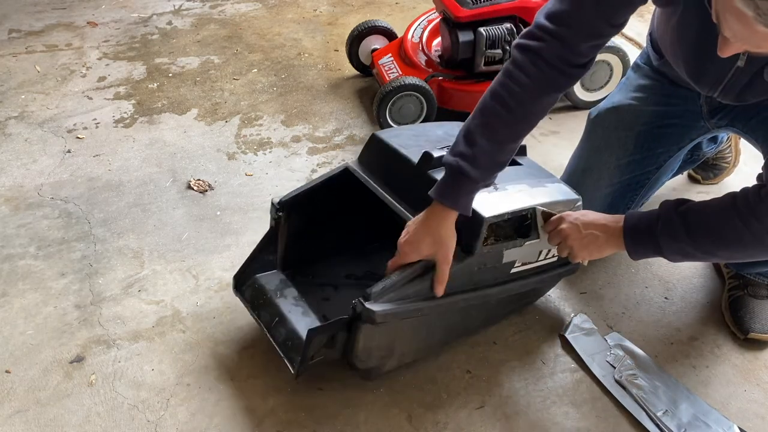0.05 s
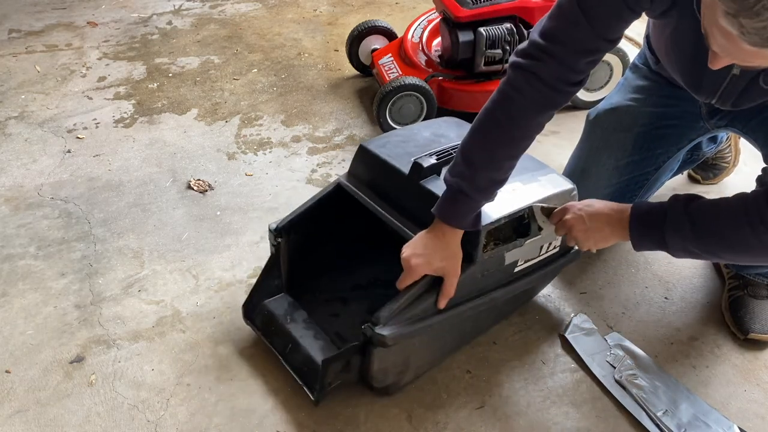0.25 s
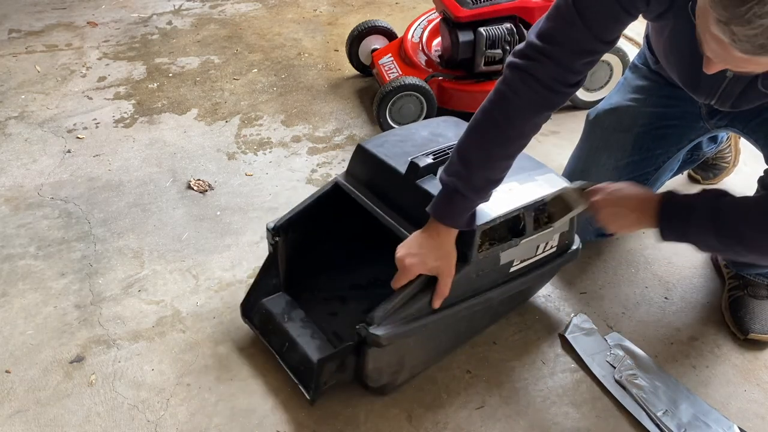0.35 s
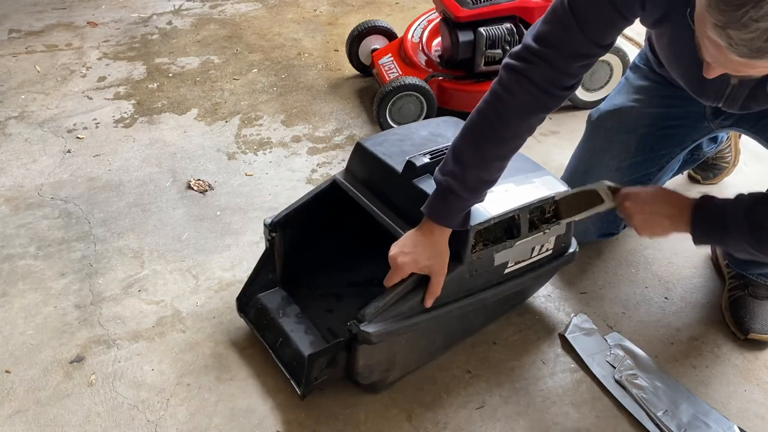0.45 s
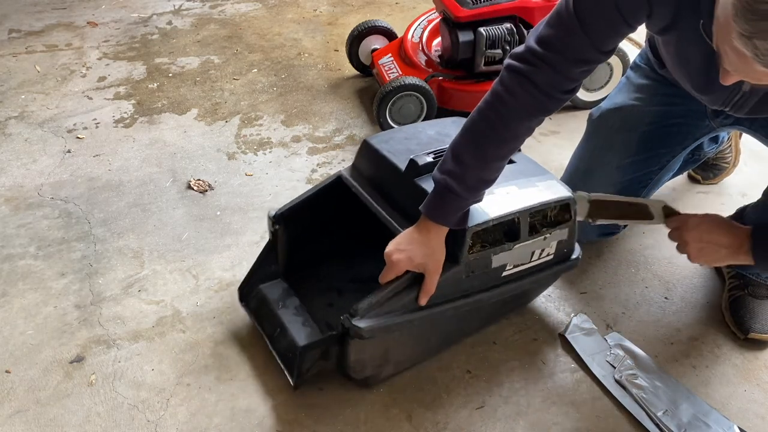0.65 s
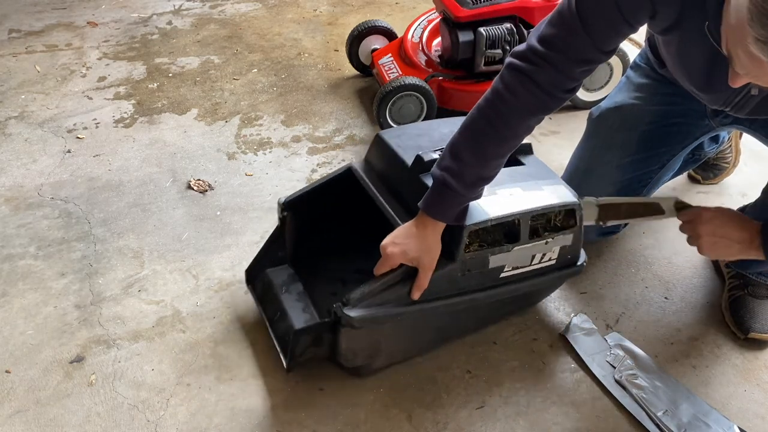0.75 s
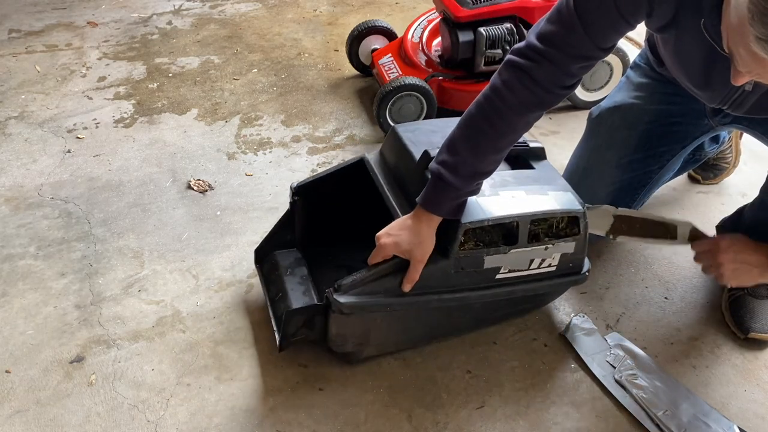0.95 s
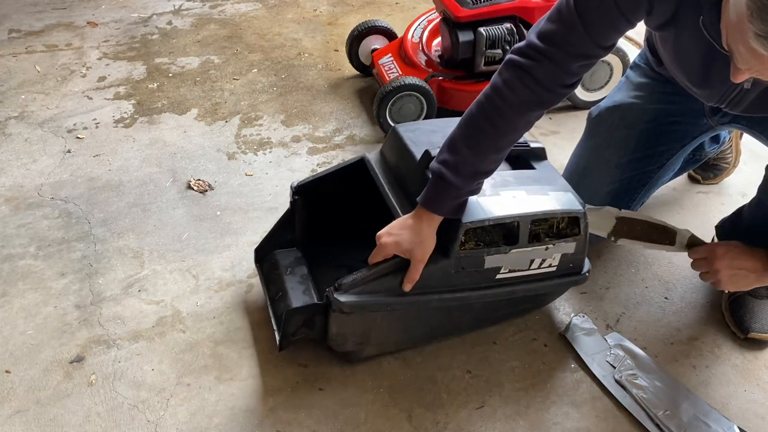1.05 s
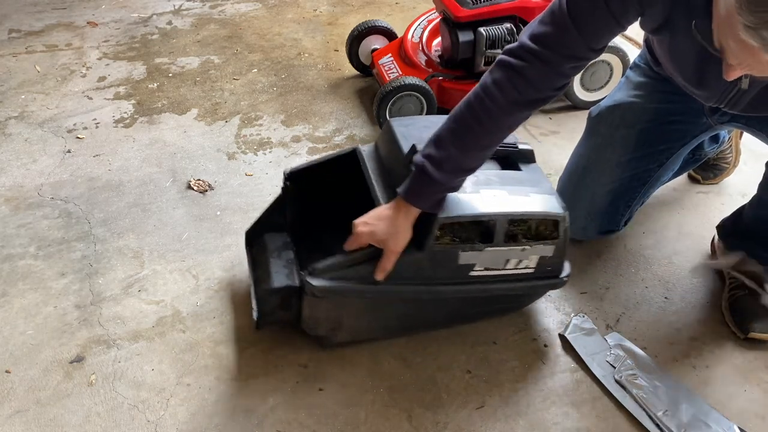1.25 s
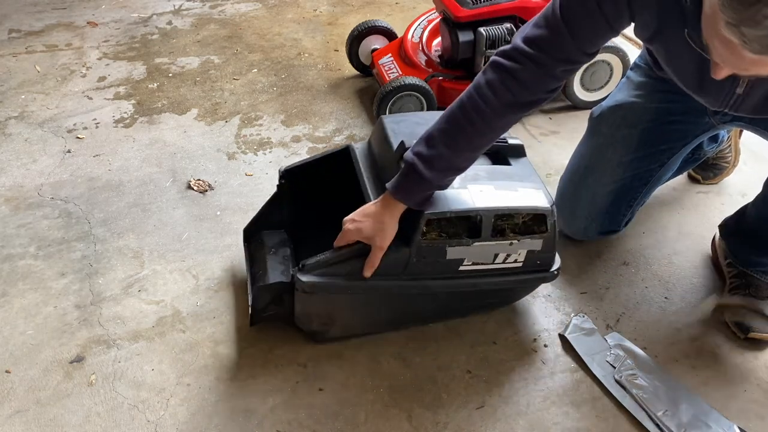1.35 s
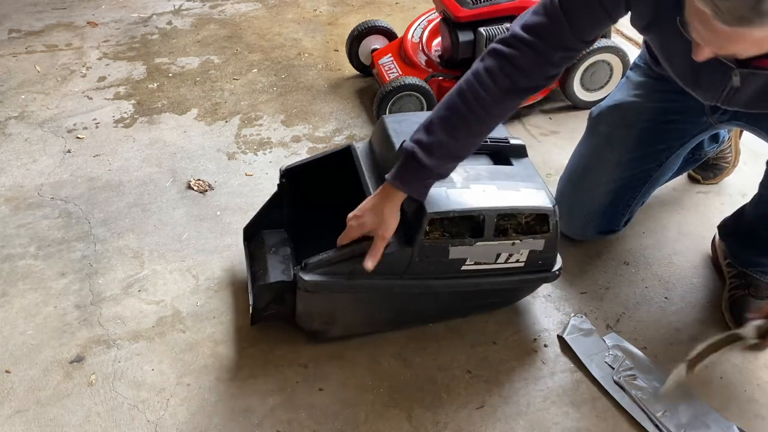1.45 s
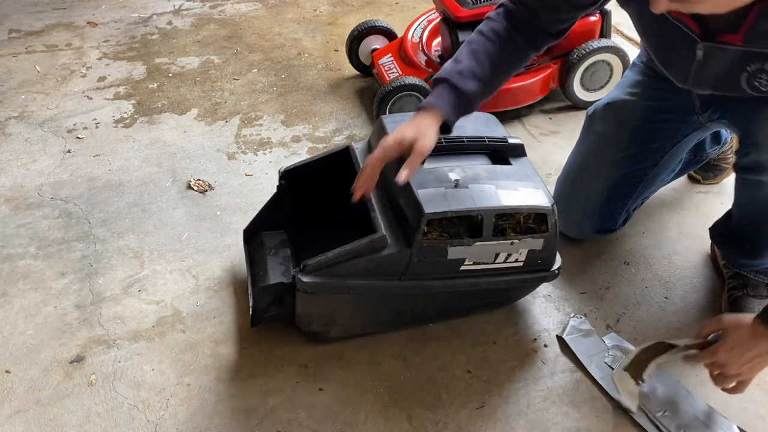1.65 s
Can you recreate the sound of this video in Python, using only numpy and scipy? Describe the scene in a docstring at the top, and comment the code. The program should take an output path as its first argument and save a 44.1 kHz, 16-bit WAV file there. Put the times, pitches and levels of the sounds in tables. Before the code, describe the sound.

Sticky tape peels off a hollow plastic box, close and central. It starts faintly, swells into crackling slips, and jerks hardest around 0.3 s with a hollow, humming judder and sharp snaps. Rougher tugs continue from 0.47 to 0.8 s, then weaken. A soft low thud comes at 1.0 s, another crackling burst at 1.1-1.35 s, then sparse ticks and a faint shift near 1.65 s. Short garage echo, quiet low rumble.

```python
"""Duct tape is tugged off a hollow plastic grass box on a garage floor, straight ahead of a stereo pair.
From the start the glue lets go in tiny irregular slips: they crackle in the tape, rattle the wall and boom
in the box, while threads of glue snap with ticks and knocks. Harder tugs follow, and the box hums as it judders.
At one second the freed box rocks with a soft low thud; more tugs follow, then a faint last shift.
The bare garage answers every sound with a short echo, over a quiet low rumble of the surroundings."""
import sys
import numpy as np
from scipy import signal
from scipy.fft import rfft, irfft, next_fast_len
from scipy.io import wavfile
from scipy.ndimage import uniform_filter1d, map_coordinates

SR = 44100
rng = np.random.default_rng(int(sys.argv[2]) if len(sys.argv) > 2 else 0)


def store_pcm(level_fs):
    """Save levels as 16-bit WAV."""
    pcm = np.round(np.clip(level_fs, -1, 1) * 32767).astype(np.int16)
    wavfile.write(sys.argv[1], SR, np.atleast_2d(pcm).T)


N = 74970  # samples, 1.7 s

# tugs and small shifts of the stretched tape; low and high are modes of the panel under it:
# start_s, rise_s, hold_s, swell_db (over the hold), boom_db, wall_db, crackle_db,
# low_hz, low_db, high_hz, high_db
TUGS = [(0.0, 0.00039, 0.064, -19, -44.5, -45.5, -48.5, 134, -50, 768, -57),
        (0.086, 0.059, 0.051, -0.5, -33, -33, -42, 245, -31.5, 551, -62),
        (0.2, 0.02, 0.086, -7.5, -28.5, -38.5, -37.5, 137, -33, 1898, -47),
        (0.287, 0.005, 0.045, 2.5, -22.5, -23.5, -30.5, 150, -27.5, 859.6, -23),
        (0.314, 0.013, 0.013, -5, -23, -34, -28, 358, -16, 1523, -27),
        (0.332, 0.01, 0.023, -2.5, -26, -23, -32, 449.3, -17.5, 583, -28),
        (0.469, 0.011, 0.038, 5, -30, -31.5, -40.5, 335, -28, 1133, -29.5),
        (0.515, 0.0027, 0.0037, 4, -22.5, -42, -46.5, 340, -20, 830, -30),
        (0.527, 0.006, 0.071, 10, -37, -41.5, -51.5, 390, -40.5, 1140, -63),
        (0.619, 0.019, 0.057, -1.5, -29.5, -33, -44, 221.5, -34, 615, -33),
        (0.697, 0.035, 0.09, -2, -32.5, -41.5, -53.5, 128, -43.5, 977, -46.5),
        (0.819, 0.013, 0.041, -3, -35.5, -40.5, -53.5, 270, -45, 535, -39),
        (0.868, 0.014, 0.13, -16.5, -47, -54, -62, 395, -54, 640, -56),
        (1.092, 0.0088, 0.03, 2, -53, -42, -49.5, 490, -66, 1083, -52),
        (1.123, 0.0064, 0.0043, -6.5, -52, -34, -35, 450, -22, 2590, -36),
        (1.144, 0.0076, 0.0093, 7.5, -29.5, -33.5, -47, 420, -27.5, 1096, -36),
        (1.161, 0.021, 0.086, 5.5, -40, -26, -34.5, 930, -38, 1981, -37),
        (1.268, 0.016, 0.03, -7, -34.5, -31, -42, 482, -32.5, 1100, -38.5),
        (1.346, 0.02, 0.15, -4.5, -46, -50, -57.5, 524, -59, 672, -54.5),
        (1.653, 0.029, .03, -1.5, -51.5, -70, -66, 215, -49, 667, -68)]
# snapping glue threads and kinks in the loose tape: start_s, tick_db, knock_db (in the wall), ring_hz
SNAPS = [(0.142, -25.5, -29, 2500), (0.147, -23, -29.5, 1300), (0.219, -21, -30.5, 2860),
         (0.227, -29, -23.5, 2090), (0.248, -36, -44, 2410), (.297, -21, -15.5, 2670),
         (.326, -27, -19, 3630), (.466, -29.5, -24, 2890), (.475, -36, -22, 2450), (.522, -30.5, -19, 1150),
         (0.56, -33, -26.5, 1930), (0.601, -28.5, -31, 2100), (0.6151, -28, -28, 2020),
         (0.632, -34, -31.5, 2240), (0.634, -24, -30.5, 7960), (0.641, -41, -25.5, 1340),
         (0.768, -33, -35, 5270), (0.799, -32.5, -65, 5500), (0.923, -32, -32, 2010),
         (.939, -43, -37.5, 2105), (1.128, -24, -22, 2870), (1.173, -25, -20, 6880),
         (1.178, -26, -20.5, 910), (1.419, -33, -38, 6100), (1.5, -47, -41, 1860),
         (1.616, -43.5, -61, 6000), (1.664, -48, -57, 2020)]
# modes of the hollow box: pitch_hz, level_db, t60_s
BOX_MODES = [(122.4, -5, 0.069), (161, -6.5, 0.052), (207.7, -2, 0.14), (226.7, -1.5, 0.078),
             (260.7, -5.5, 0.068), (342.7, -6.5, 0.094), (365, -7, 0.027), (422.8, -11.5, 0.2),
             (491, -9.5, 0.07), (578.6, -13, 0.026), (679, -17.5, 0.51), (823, -22, 0.011),
             (1554, -25, 0.0062)]
# the tape judders in step with the box: start_s, hold_s, first_hz, last_hz, level_db
JUDDERS = [(0.29, 0.032, 221, 226.4, -12.5), (0.325, 0.043, 244, 258.7, -15),
           (0.518, 0.06, 209.5, 202.3, -28), (0.76, 0.03, 226, 222.2, -33.5), (1.175, 0.06, 232, 216, -31),
           (1.275, 0.045, 225.2, 220.6, -28.5)]
# spectrum of the rattling box wall: freq_hz, level_db
WALL_SPECTRUM = [(60, -8), (150, -19.5), (300, -5), (420, 4), (700, -1), (1150, -0.5), (1450, -5.5),
                 (2100, -4.5), (3200, -14), (6000, -21), (16000, -52.5)]
# spectrum of the crackling tape, before harder tugs brighten it: freq_hz, level_db
TAPE_SPECTRUM = [(200, 5), (1200, 15), (2800, -7.5), (4500, 8.5), (5800, 4), (7300, 3), (11000, 6),
                 (16000, 2)]
# spectrum of a snapping thread's tick: freq_hz, level_db
TICK_SPECTRUM = [(300, 18.5), (2000, -22.5), (5000, 12), (7500, 10.5), (11000, 9.5), (16000, 9)]
# spectrum of the low rumble around the garage: freq_hz, level_db
RUMBLE_SPECTRUM = [(20, -11), (48, -2), (85, 0), (200, -10.5), (500, -22), (2000, -24), (8000, -35),
                   (16000, -44)]
# how long the garage rings: freq_hz, t60_s
GARAGE_DECAY = [(100, 0.4), (400, 0.49), (2000, 0.68), (6000, 0.46), (15000, 0.19)]
# strength of the garage echo: freq_hz, echo_db
ECHO_LEVEL = [(60, -2.5), (200, -11), (600, -4), (2000, -5.5), (6000, 1), (15000, -3)]
# stereo width of the echo: freq_hz, side_over_mid_db
ECHO_WIDTH = [(60, -11), (130, -23), (300, 1), (800, 2.5), (15000, -7)]
# stereo spread of the box and tape: freq_hz, side_over_mid_db
SOURCE_WIDTH = [(60, -49), (1000, -16), (3000, -11), (6000, -5.5), (10000, 1), (16000, 0.5)]
# balance of the stereo pair: freq_hz, left_over_right_db
LEFT_LEAD = [(60, -.7), (130, -1), (600, .6), (3500, 1.6), (7000, .6), (12000, 0)]

# how the glue lets go: slips a second in a tug of usual crackle, and their uneven sizes
SLIPS_PER_S, SLIP_SCATTER_DB, CLUMP_DB, CLUMPS_PER_S = 3000, 1.5, 0.75, 330
USUAL_CRACKLE_DB = -32
DOUBLING_DB = 12.5  # a tug this much louder slips twice as often
# a harder tug is brighter: dB per octave above this pitch, for each dB of crackle
BRIGHTEN, BRIGHT_FROM_HZ = 0.15, 6300
RISE_DB = 16.5  # gain over a tug's rise
# time for each part to fall 60 dB after the tug: the plastic rings out longer than the glue crackles
BOOM_RELEASE_S, WALL_RELEASE_S, TAPE_RELEASE_S = .22, .19, .16
PANEL_RELEASE_S = 0.11  # the hand damps the panel
PANEL_WANDER_HZ = 25.5  # waver of a panel mode at 1 kHz; lower modes waver less
# decays to -60 dB of single puffs of noise and of a snapped spot's ring
WALL_T60_S, TAPE_T60_S, TICK_T60_S, KNOCK_T60_S, KINK_T60_S = 0.0081, 0.01, 0.017, 0.038, 0.013
KINK_RING_DB = -0.5  # ring of the spot where a thread snaps, against its knock_db
RADIATION_HZ = 107.5  # below this the box moves little air
JUDDER_RISE_S, JUDDER_SAG_DB, JUDDER_OCTAVE_DB = 0.0031, -2.5, -13
# rocking of the freed box; its level is taken before the soft onset
ROCK_S, ROCK_HZ, ROCK_DB, ROCK_RISE_S, ROCK_T60_S = 1, 56.7, -25, 0.048, 0.76
SCATTER_HZ = 55  # bandwidth over which the scattered treble keeps its phase
RUMBLE_DB = -49.5  # rms of the rumble in the middle of the stereo picture
TOP_HZ = 15900  # nothing is kept from here up


def peeling():
    """The slips of each tug drive the hollow box, its wall, the panel under the tape and the tape itself."""
    hollow, wall, tape = np.zeros((3, N))
    box = ring(BOX_MODES)
    for (start, rise, hold, swell_db, boom_db, wall_db, crackle_db,
         low_hz, low_db, high_hz, high_db) in TUGS:
        harder_db = crackle_db - USUAL_CRACKLE_DB
        train = evened(slips(SLIPS_PER_S * 2 ** (harder_db / DOUBLING_DB)))
        tug = (start, rise, hold, swell_db)

        boom = evened(through(train, box))
        hollow += amp(boom_db) * effort(*tug, BOOM_RELEASE_S) * boom
        panel = amp(low_db) * panel_mode(low_hz) + amp(high_db) * panel_mode(high_hz)
        hollow += effort(*tug, PANEL_RELEASE_S) * panel

        rattle = puffs(train, WALL_T60_S)
        wall += amp(wall_db) * effort(*tug, WALL_RELEASE_S) * rattle

        crackle = through(puffs(train, TAPE_T60_S), colour(brightened_tape(harder_db)))
        tape += amp(crackle_db) * effort(*tug, TAPE_RELEASE_S) * crackle
    low_cut = signal.butter(4, RADIATION_HZ, "highpass", fs=SR, output="sos")
    return signal.sosfilt(low_cut, hollow + through(wall, colour(WALL_SPECTRUM))) + tape


def slips(rate):
    """Irregular, clumped releases of the glue, rate a second on average: impulses of rms 1."""
    clumps = wobble(CLUMPS_PER_S)
    fired = rng.random(N) < rate / SR
    scatter = np.clip(rng.standard_normal(N), -2, 2)
    sizes = amp(SLIP_SCATTER_DB * scatter + CLUMP_DB * clumps)
    return unit(fired * sizes * rng.choice([-1, 1], N))


def effort(start, rise, hold, swell_db, release):
    """Gain of one tug: it tightens, peels and lets go, in straight lines of decibels."""
    t = np.arange(N) / SR - start
    tightening_db = RISE_DB * np.minimum(t / rise - 1, 0)
    peeling_db = swell_db * (np.clip((t - rise) / hold, 0, 1) - .5)
    release_db = -60 * np.maximum(t - rise - hold, 0) / release
    return amp(np.maximum(tightening_db + peeling_db + release_db, -200))


def evened(x, span_s=0.044):
    """Even out the short-term power of a part, so that each tug's envelope sets its loudness."""
    power = uniform_filter1d(x ** 2, max(int(span_s * SR), 64))
    return x / np.sqrt(np.abs(power) + 1e-6)


def puffs(train, t60):
    """Every slip releases a short puff: noise follows the decaying power of the slips."""
    fade = amp(-120 * np.arange(2048) / SR / t60)  # decay of power, so twice the dB
    power = signal.fftconvolve(train ** 2, fade / fade.sum())[:N]
    return np.sqrt(np.abs(power)) * rng.standard_normal(N)


def brightened_tape(harder_db):
    """Tape spectrum tilted up in the treble for a harder tug, down for a softer one."""
    tilt = BRIGHTEN * harder_db
    return [(hz, db + tilt * max(np.log2(hz / BRIGHT_FROM_HZ), 0)) for hz, db in TAPE_SPECTRUM]


def panel_mode(hz):
    """One mode of the panel under the tape, kept singing by the slips."""
    return sing(hz, wander_hz=PANEL_WANDER_HZ * np.sqrt(hz / 1000), flutter_db=6)


def sing(hz, wander_hz, flutter_db, rate=140):
    """A resonance kept going by uneven slips: its pitch and level waver."""
    phase = 2 * np.pi * (np.cumsum(hz + wander_hz * wobble(rate)) / SR + rng.random())
    return unit(amp(flutter_db * wobble(rate)) * np.sin(phase))


def ring(modes):
    """Impulse response of damped sines with alternating signs; each level is that mode's energy."""
    t = np.arange(SR // 2) / SR
    response = np.zeros(len(t))
    for k, (hz, db, t60) in enumerate(modes):
        decay = amp(db - 60 * t / t60) / np.sqrt(t60)
        response += (-1) ** k * decay * np.cos(2 * np.pi * hz * t)
    return response


def judder():
    """Under a hard pull the glue sticks and slips in step with the box, which hums as it flexes."""
    t, hum = np.arange(N) / SR, np.zeros(N)
    for start, hold, first_hz, last_hz, db in JUDDERS:
        hz = np.interp(t, [start, start + hold], [first_hz, last_hz])
        tone = sing(hz, wander_hz=5.26, flutter_db=5.5)
        octave = sing(2 * hz, wander_hz=14.55, flutter_db=0)
        gain = amp(db) * effort(start, JUDDER_RISE_S, hold, JUDDER_SAG_DB, BOOM_RELEASE_S)
        hum += gain * (tone + amp(JUDDER_OCTAVE_DB) * octave)
    return hum


def snaps():
    """Each snap is a bright tick and a short knock that rings at the pitch of its spot."""
    ticks, knocks, rings = np.zeros((3, N + SR))  # room for the tails
    t = np.arange(4096) / SR
    for start, tick_db, knock_db, hz in SNAPS:
        span = slice(round(start * SR), round(start * SR) + len(t))
        ticks[span] += amp(tick_db) * burst(TICK_T60_S)
        knocks[span] += amp(knock_db) * burst(KNOCK_T60_S)
        decay = amp(knock_db + KINK_RING_DB - 60 * t / KINK_T60_S)
        rings[span] += decay * np.sin(2 * np.pi * hz * t)
    return through(ticks, colour(TICK_SPECTRUM)) + through(knocks, colour(WALL_SPECTRUM)) + rings[:N]


def burst(t60, size=4096):
    """A quickly dying puff of noise."""
    return rng.standard_normal(size) * amp(-60 * np.arange(size) / SR / t60)


def rocking():
    """The box rocks with a soft low thud as the tape comes free: a damped sine with a gentle onset."""
    t = np.maximum(np.arange(N) / SR - ROCK_S, 0)
    onset = 1 - np.exp(-t / ROCK_RISE_S)
    return amp(ROCK_DB - 60 * t / ROCK_T60_S) * onset * np.sin(2 * np.pi * ROCK_HZ * t)


def garage(x, count=9):
    """The garage echo: several responses of the same bare room crossfade, evening out its colour."""
    place = np.linspace(0, count - 1, N)
    wet = np.zeros((2, N))
    for k in range(count):
        share = np.cos(np.pi / 2 * np.clip(place - k, -1, 1))
        wet += signal.fftconvolve((x * share)[None], echo(), axes=1)[:, :N]
    return wet


def echo():
    """One stereo response of the bare walls: noise dying at each pitch's own rate, narrower in the bass."""
    hz, t, noise = signal.stft(rng.standard_normal((2, SR * 3 // 4)), SR, nperseg=256)
    decay = amp(-60 * t / along(GARAGE_DECAY, hz)[:, None]) * (t > 0)
    decay *= amp(along(ECHO_LEVEL, hz))[:, None] / np.sqrt(np.mean(decay ** 2, axis=1, keepdims=True))
    width = np.array([np.ones(len(hz)), amp(along(ECHO_WIDTH, hz))])[:, :, None]
    mid, side = signal.istft(noise * decay * width, SR, nperseg=256)[1]
    return np.array([mid + side, mid - side]) / np.sqrt(2 * len(mid))


def scattered(hz):
    """A phase that wanders randomly with frequency, to spread the sound in stereo."""
    return np.exp(1j * np.cumsum(rng.standard_normal(len(hz))) * np.sqrt(hz[1] / SCATTER_HZ))


def background(side_db=-12):
    """Quiet low rumble of the surroundings: shaped noise, mostly in the middle."""
    noise = rng.standard_normal((2, N))
    mid, side = unit(filtered(noise, lambda hz: amp(along(RUMBLE_SPECTRUM, hz))))
    side = amp(side_db) * side
    return amp(RUMBLE_DB) * np.array([mid + side, mid - side])


def amp(db):
    """Decibels to gain."""
    return 10 ** (np.asarray(db) / 20)


def unit(x):
    """Scale to rms 1."""
    return x / np.sqrt(np.mean(x ** 2) + 1e-20)


def wobble(rate):
    """A random curve of straight segments, rate knots a second."""
    return map_coordinates(rng.standard_normal(N), [np.arange(N) * rate / SR], order=1)


def along(points, hz):
    """Read (Hz, value) points on a log frequency axis."""
    f, v = np.transpose(points)
    return np.interp(np.log(hz + 1), np.log(f + 1), v)


def filtered(x, response):
    """Multiply the spectrum of x by a response of frequency."""
    m = next_fast_len(N + SR // 2)
    return irfft(rfft(x, m) * response(np.fft.rfftfreq(m, 1 / SR)), m)[..., :N]


def through(x, response):
    """Play x into an impulse response scaled to energy 1."""
    return signal.fftconvolve(x, response / np.linalg.norm(response))[:N]


def colour(points, size=2048):
    """Causal, minimum-phase impulse response with the given spectrum, by folding its cepstrum."""
    cepstrum = irfft(np.log(amp(along(points, np.fft.rfftfreq(size, 1 / SR)))))
    cepstrum[1:size // 2] *= 2
    cepstrum[size // 2 + 1:] = 0
    return irfft(np.exp(rfft(cepstrum)))


def scene():
    """Tape and box straight ahead; the treble scatters off the floor and spreads wide."""
    mid = peeling() + judder() + snaps() + rocking()
    side = filtered(mid, lambda hz: amp(along(SOURCE_WIDTH, hz)) * scattered(hz))
    pair = np.array([mid + side, mid - side]) + garage(mid)
    # half of the lead raises the left, half lowers the right
    balanced = filtered(pair, lambda hz: amp(np.outer([.5, -.5], along(LEFT_LEAD, hz))))
    return balanced + background()


def record(dry):
    """The loudest peaks are rounded off at full scale; nothing is kept above the band limit."""
    rounded = dry / (1 + np.abs(dry) ** 8) ** (1 / 8)
    return filtered(rounded, lambda hz: hz < TOP_HZ)


dry = scene()
out = record(dry)
store_pcm(out)
```